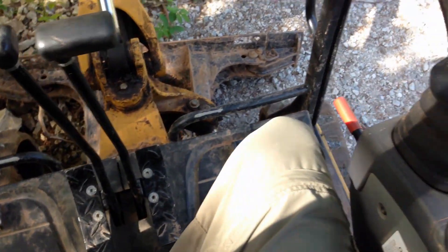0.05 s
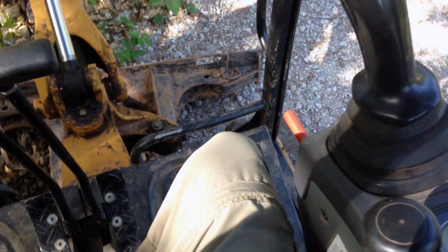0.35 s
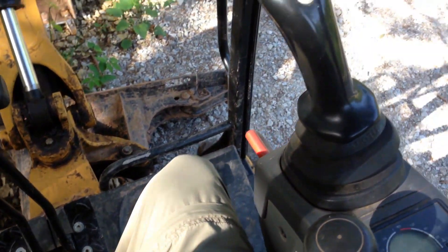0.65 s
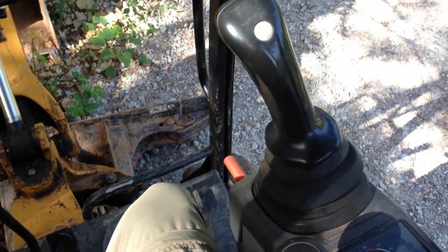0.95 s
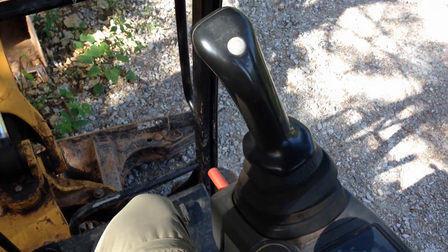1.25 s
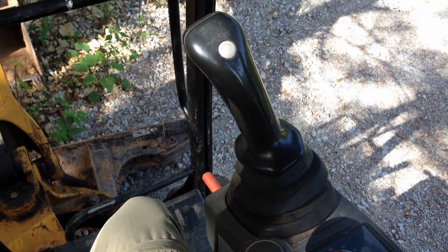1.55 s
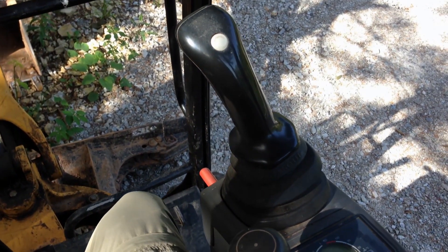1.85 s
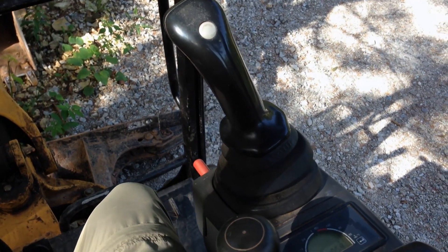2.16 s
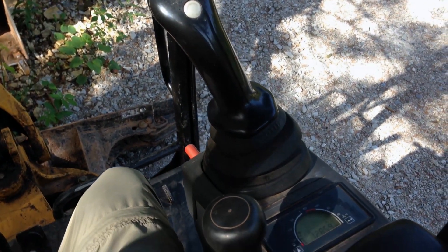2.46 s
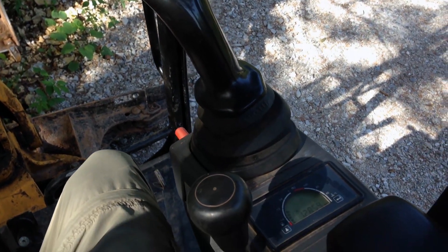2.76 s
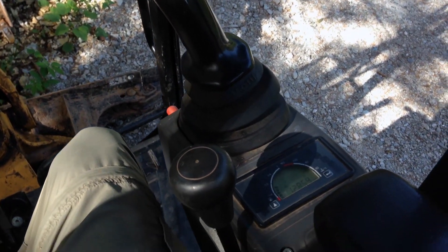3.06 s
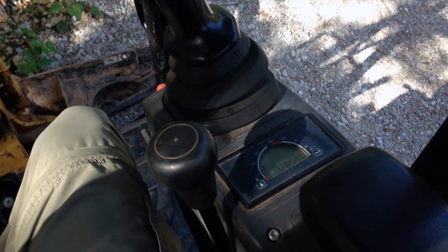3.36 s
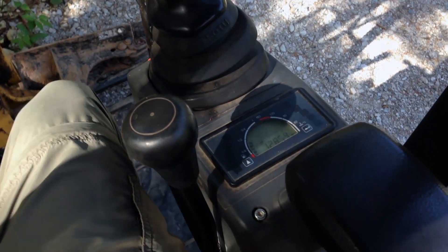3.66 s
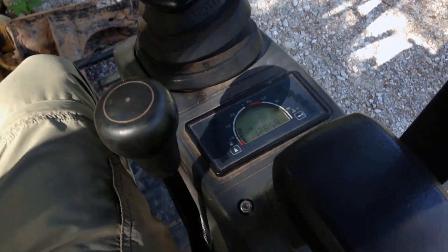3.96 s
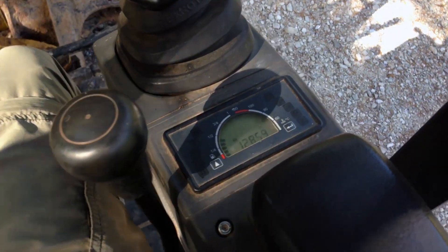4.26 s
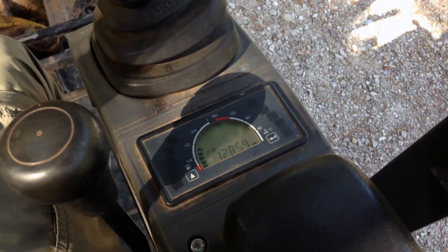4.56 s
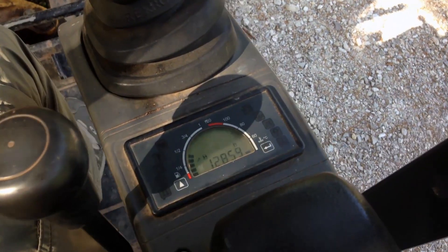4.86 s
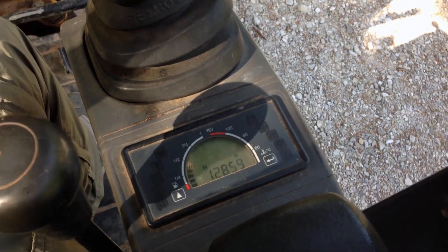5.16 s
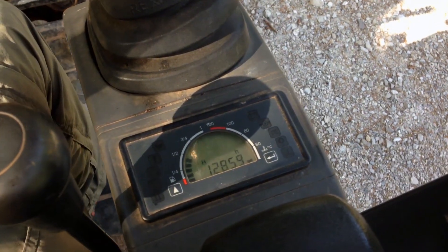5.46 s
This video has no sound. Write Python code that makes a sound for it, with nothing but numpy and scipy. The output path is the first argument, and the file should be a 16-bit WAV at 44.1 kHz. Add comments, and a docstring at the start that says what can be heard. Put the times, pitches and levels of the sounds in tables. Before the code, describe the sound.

Inside a mini excavator's cab, the idling diesel engine throbs evenly, with a hydraulic whine, drumming panels and faint metal clinks.

```python
"""Mini excavator idling

A three-cylinder diesel, with the microphone at the driver's seat. Exhaust pulses throb and beat
against the cooling fan, the hydraulic pump whines, combustion knock and valves clatter. The shaking
sets cab panels drumming and loose parts clinking; a few soft bumps and scuffs sound close by."""
import sys
import numpy as np
from scipy import signal
from scipy.fft import rfft, irfft
from scipy.io import wavfile
from scipy.ndimage import map_coordinates

SR = 44100
rng = np.random.default_rng(int(sys.argv[2]) if len(sys.argv) > 2 else 0)


def bounce(signal):
    """Save signal as a 16-bit WAV file at the path given by the first command-line argument."""
    frames = np.transpose(np.atleast_2d(signal))
    limited = np.clip(frames, -1, 1)
    pcm = np.round(limited * 32767).astype(np.int16)
    wavfile.write(sys.argv[1], SR, pcm)


N = 247401
CYCLE_HZ = 11.078  # one engine cycle is two crank turns with three firings


def from_db(db):
    """Decibels to gain."""
    return 10 ** (np.asarray(db) / 20)


def unit_rms(x):
    """Scale to unit power."""
    return x / np.sqrt(np.mean(x ** 2) + 1e-20)


def seconds():
    """Time of every sample."""
    return np.arange(N) / SR


def drift(rate_hz):
    """A smooth random wander of rms 1 that changes about rate_hz times a second."""
    knots = rng.standard_normal(4000)
    return unit_rms(map_coordinates(knots, [seconds() * rate_hz + 2], order=3, mode="wrap"))


def swell(at_s, width_s):
    """A bell-shaped rise to 1 and fall."""
    return np.exp(-.5 * ((seconds() - at_s) / width_s) ** 2)


def colour(x, spectrum):
    """Shape x by a spectrum drawn on a log-frequency axis; rms 1."""
    hz, db = np.transpose(spectrum)
    f = np.maximum(np.fft.rfftfreq(N, 1 / SR), 1)
    gain = from_db(np.interp(np.log(f), np.log(hz), db))
    skirts = np.minimum(f / hz[0], 1) ** 2 * np.minimum(hz[-1] / f, 1) ** 2
    return unit_rms(irfft(rfft(x) * gain * skirts, N))


def blows(cycle, contacts, rise_s, decay_s, scatter_db, wash, alike):
    """Contacts recur each cycle and die away as noise, partly alike every time, over a steady wash."""
    power = np.full(N, wash ** 2)
    for share, db in contacts:
        turn, since = np.divmod(cycle - share + 2, 1)
        strength = from_db(db + scatter_db * rng.uniform(-1.13, 1, size=128))[turn.astype(int)]
        age_s = since / CYCLE_HZ
        power += (strength * (1 - np.exp(-age_s / rise_s)) * np.exp(-age_s / decay_s)) ** 2
    period = round(SR / CYCLE_HZ)
    repeating = rng.standard_normal(period)[(cycle * period).astype(int) % period]
    fresh = rng.standard_normal(N)
    return np.sqrt(power) * (np.sqrt(alike) * repeating + np.sqrt(1 - alike) * fresh)


def lean(nearest_s, approach_s, retreat_s):
    """How far the microphone leans down towards the side console, 0-1."""
    return swell(nearest_s, np.where(seconds() < nearest_s, approach_s, retreat_s))


STRONG_PULSE_SHARE = .123  # how far into the cycle the strongest exhaust pulse leaves
# Exhaust note at the seat: order (multiple of the cycle rate), relative_db
EXHAUST_ORDERS = [(3, -18), (6, -6), (9, -2), (12, 2.5), (13, -18), (14, -8.5), (15, -6.5), (16, -38),
                  (18, -25.5), (19, -22.5), (20, -16), (23, -19)]

def exhaust(cycle, level_db, uneven_db):
    """All orders peak together at the strong cylinder's pulse; no two firings are quite equal."""
    angle = 2 * np.pi * (cycle - STRONG_PULSE_SHARE)
    note = sum(-from_db(db) * np.cos(order * angle) for order, db in EXHAUST_ORDERS)
    return from_db(level_db + uneven_db * drift(24.9)) * unit_rms(note)


def fan(cycle, level_db, slip_hz, in_step_s):
    """The belt-driven blade tone slips past the strongest exhaust order, so the hum swells and sinks."""
    blade_passes = 12 * (cycle - STRONG_PULSE_SHARE) - slip_hz * (seconds() - in_step_s)
    return -from_db(level_db) * np.sqrt(2) * np.cos(2 * np.pi * blade_passes)


# Tones of the hydraulic pump: order, relative_db
PUMP_ORDERS = [(48, 0), (54, -22.5), (91, -26), (96, -20.5), (198, -25), (391, -27)]
# Its main tone at the seat: time_s, level_db
PUMP_LEVELS = [(0.15, -47.5), (3.28, -51.5), (5.5, -49)]

def pump(cycle, flutter_db, weak_flutter_db, surge):
    """The pump whines; its shaft speeds up at each firing and the weak tones flutter most."""
    main_order = PUMP_ORDERS[0][0]
    shaft = cycle + surge / main_order * np.sin(2 * np.pi * 3 * cycle)
    whine = np.zeros(N)
    for order, db in PUMP_ORDERS:
        waver_db = flutter_db * drift(21.94) + weak_flutter_db * drift(40) * (order != main_order)
        whine += from_db(db + waver_db) * np.cos(2 * np.pi * (order * shaft + rng.random()))
    level_db = np.interp(seconds(), *np.transpose(PUMP_LEVELS))
    return from_db(level_db) * np.sqrt(2) * whine


# Gear tones that come and go as the microphone moves in the cab: peak_s, width_s, order, level_db
GEAR_TONES = [(.1, 0.35, 97, -64.5), (.3, 0.89, 154, -63), (.7, 0.75, 70, -64.5), (1.3, 0.19, 136, -63.5),
              (2.4, 0.42, 136, -63.5), (2.445, 0.49, 70, -64.5), (3.3, .6, 64, -63),
              (4.195, 0.31, 154, -67), (4.9, .6, 136, -66)]

def gears(cycle, backlash_rad):
    """Faint meshing tones, roughened by play between the teeth."""
    tones = np.zeros(N)
    for peak_s, width_s, order, db in GEAR_TONES:
        phase = 2 * np.pi * order * cycle + backlash_rad * drift(60)
        tones += from_db(db) * swell(peak_s, width_s) * np.cos(phase)
    return np.sqrt(2) * tones


# Exhaust puffs reaching the cab: cycle_share, relative_db
EXHAUST_PUFFS = [(0.064, 2.5), (.4, 1), (0.732, 0.5)]
# The cab's boom, from inside: frequency_hz, relative_db
CAB_SPECTRUM = [(28, -9), (48, -7.5), (75, -5), (105, -3.5), (150, 3.5), (200, -3.5), (240, -21.5),
                (310, -19.5), (385, -11), (470, -13), (600, -23.5), (770, -20.5), (950, -32)]

def cab_boom(cycle, level_db):
    """Each exhaust puff sets the cab booming."""
    puffs = blows(cycle, EXHAUST_PUFFS, rise_s=.0032, decay_s=.0059, scatter_db=3.5, wash=.41, alike=.11)
    return from_db(level_db) * colour(puffs, CAB_SPECTRUM)


# Shocks to the panels: cycle_share, relative_db
PANEL_SHOCKS = [(0.043, -2.5), (.14, -6), (0.366, -4.5), (.46, -6.5), (.765, -5.5), (0.849, -9), (0.952, 0)]
# Panels around the seat: frequency_hz, relative_db
PANEL_SPECTRUM = [(140, -11.5), (190, 9), (225, 4), (290, -3), (370, -3.5), (520, -4), (600, -9),
                  (680, -13.5), (850, -41), (1500, -34)]

def cab_panels(cycle, level_db):
    """The engine's shaking drums on the cab panels."""
    shocks = blows(cycle, PANEL_SHOCKS, rise_s=.00057, decay_s=.0085, scatter_db=3, wash=.4, alike=.33)
    return from_db(level_db) * colour(shocks, PANEL_SPECTRUM)


# The three firings: cycle_share, relative_db
FIRINGS = [(0.144, 7.5), (.475, 4.5), (.805, 7.5)]
# Engine block, from the seat: frequency_hz, relative_db
BLOCK_SPECTRUM = [(400, 5), (750, -14), (900, -0.5), (1080, 3), (1280, -4.5), (1650, 3), (2200, 0),
                  (3100, -8.5), (4200, -11), (6000, -28.5), (15000, -30)]

def combustion_knock(cycle, level_db):
    """Each firing knocks on the engine block."""
    knocks = blows(cycle, FIRINGS, rise_s=.0022, decay_s=.01, scatter_db=6, wash=.96, alike=.39)
    return from_db(level_db) * colour(knocks, BLOCK_SPECTRUM)


# Valve and injector ticks: cycle_share, relative_db
VALVE_TICKS = [(0.089, 1.5), (.26, -6.5), (.485, -0.5), (.66, 0), (0.717, 0), (0.793, -4), (.92, -8.5)]
# Cylinder head, from the seat: frequency_hz, relative_db
HEAD_SPECTRUM = [(1000, -4.5), (2500, 0), (4200, -0.5), (5400, -6.5), (6600, -7.5), (8500, -12.5),
                 (9500, -15.5), (10600, -15), (12500, -20.5), (15500, -21)]

def valves(cycle, level_db):
    """Valves and injectors tick sharply through the cylinder head."""
    ticks = blows(cycle, VALVE_TICKS, rise_s=.0001, decay_s=.0055, scatter_db=2, wash=.65, alike=.26)
    return from_db(level_db) * colour(ticks, HEAD_SPECTRUM)


def ring(x, hz, t60_s):
    """One damped mode: a unit click sets a sine of height 1 ringing."""
    radius = from_db(-60 / (t60_s * SR))
    step = 2 * np.pi * hz / SR
    return signal.lfilter([0, np.sin(step)], [1, -2 * radius * np.cos(step), radius ** 2], x + 1e-18)


# Modes of a thin cover: pitch_hz, relative_db, t60_s
COVER_MODES = [(2070, -1.5, 0.025), (2160, -0.5, 0.012), (2520, -1.5, 0.052), (2706, -1, 0.037),
               (2996, 1, 0.041), (3237, 0.5, 0.037)]

def cover_buzz(cycle, level_db, swing_db, fade_in_s):
    """Firings shake a thin cover; each of its modes answers by chance."""
    buzz = np.zeros(N)
    for hz, db, t60_s in COVER_MODES:
        touches = blows(cycle, FIRINGS, rise_s=.0003, decay_s=.005, scatter_db=6, wash=.3, alike=0)
        buzz += from_db(db) * unit_rms(ring(touches, hz, t60_s))
    fade_in = np.minimum(seconds() / fade_in_s, 1) ** 2
    return fade_in * from_db(level_db - swing_db * drift(3.1)) * unit_rms(buzz)


def pings(start_s, count, first_db, growth_db, pitch_hz):
    """Light taps ring a small metal part, a cycle apart and each a little harder."""
    taps, index = np.zeros(N), np.arange(count)
    times_s = start_s + index / CYCLE_HZ
    taps[(times_s * SR).astype(int)] = from_db(first_db + growth_db * index)
    return ring(taps, pitch_hz, t60_s=.06)


# A loose part clinking: start_s, relative_db, pitch_hz
LOOSE_CLINKS = [(0.4953, -41, 2080), (0.6474, -41, 1800), (1.3685, -41, 2570), (1.522, -43.5, 2930),
                (2.3595, -42.5, 3000), (2.812, -43, 3080), (3.8638, -43, 2710), (4.6175, -37.5, 3090),
                (4.797, -42.5, 3020), (4.9182, -41, 2230), (5.1607, -38.5, 3000), (5.4282, -42, 2420)]

def clinks(gain_db, chatter_s):
    """Each clink is a brief gritty chatter of contacts into three close, well damped modes."""
    out, t = np.zeros(N), seconds()[:SR // 10]
    for start_s, db, hz in LOOSE_CLINKS:
        chatter = rng.standard_normal(len(t)) * np.exp(-t / chatter_s)
        side_modes = .3 * ring(chatter, hz * .9, .015) + .4 * ring(chatter, hz * 1.07, .015)
        tone = ring(chatter, hz, .035) + side_modes
        clink = from_db(db + gain_db) * tone / np.abs(tone).max()
        at = round(start_s * SR)
        out[at:at + len(t)] += clink[:N - at]
    return out


# Soft bumps close to the microphone: peak_s, relative_db
CLOSE_BUMPS = [(1.004, -36.5), (1.065, -42), (3.863, -45)]

def bumps(gain_db, pitch_hz, width_s):
    """A soft push gives one or two slow swings of pressure."""
    out = np.zeros(N)
    for peak_s, db in CLOSE_BUMPS:
        swing = -np.cos(2 * np.pi * pitch_hz * (seconds() - peak_s))
        out += from_db(db + gain_db) * swell(peak_s, width_s) * swing
    return out


# Scuffs close to the microphone: peak_s, rasp_relative_db, body_relative_db, width_s
CLOSE_SCUFFS = [(4.506, -42.5, -38, 0.0036), (4.525, -51, -41.5, 0.0063), (4.77, -43, -38, 0.0031),
                (5.004, -47.5, -62, 0.0011), (5.191, -46.5, -60, .0015)]

def scuffs(gain_db, grain_db):
    """Short grainy rubs: a bright rasp over a dull knock."""
    grains = rng.standard_normal(N) * from_db(grain_db * drift(626.8))
    rasp = colour(grains, [(1000, -1), (2400, 6.5), (3800, 7), (6500, 1.5), (9000, -9), (15000, -14)])
    body = colour(rng.standard_normal(N), [(250, 4), (600, -5), (1500, -21)])
    out = np.zeros(N)
    for peak_s, rasp_db, body_db, width_s in CLOSE_SCUFFS:
        out += swell(peak_s, width_s) * (from_db(rasp_db) * rasp + from_db(body_db) * body)
    return from_db(gain_db) * out


def scene():
    """One crank angle drives the machine; panels and clatter grow as the microphone leans in."""
    cycle = CYCLE_HZ * seconds() + .0008 * drift(6)  # engine cycles elapsed
    near = lean(nearest_s=4.67, approach_s=.58, retreat_s=.97)
    cab = cab_boom(cycle, level_db=-41.5) + cab_panels(cycle, level_db=-45 + 3 * near)
    clatter = combustion_knock(cycle, level_db=-54.5 + 2 * near)
    clatter += valves(cycle, level_db=-57 + .9 * near)
    hum = exhaust(cycle, level_db=-33, uneven_db=.18)
    hum += fan(cycle, level_db=-43, slip_hz=1.555, in_step_s=.387)
    whine = pump(cycle, flutter_db=1, weak_flutter_db=2, surge=.012) + gears(cycle, backlash_rad=.59)
    loose = cover_buzz(cycle, level_db=-61, swing_db=.5, fade_in_s=.55)
    loose += pings(start_s=.184, count=4, first_db=-64, growth_db=3, pitch_hz=8720)
    loose += clinks(gain_db=-1, chatter_s=.009)
    nearby = bumps(gain_db=11.5, pitch_hz=72, width_s=.0042) + scuffs(gain_db=-1.5, grain_db=2.5)
    return (hum + whine + cab + clatter + loose + nearby)[None]


def record(dry):
    """One microphone at the seat, its top end cut steeply."""
    cutoff_hz = 15300
    return signal.sosfilt(signal.ellip(12, .1, 80, cutoff_hz, fs=SR, output="sos"), dry)


dry = scene()
out = record(dry)
bounce(out)
```